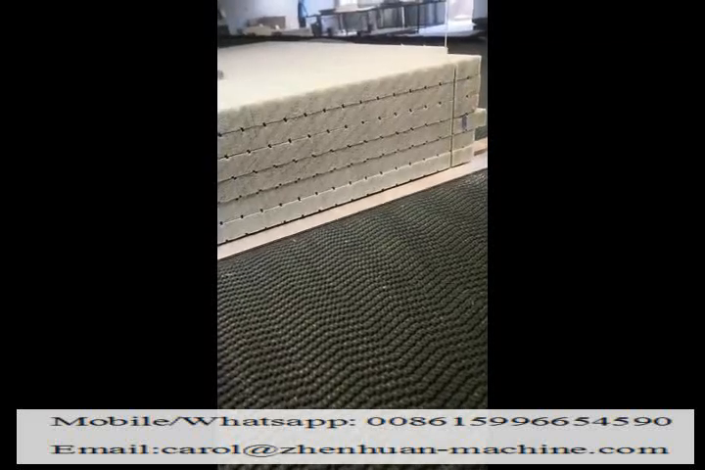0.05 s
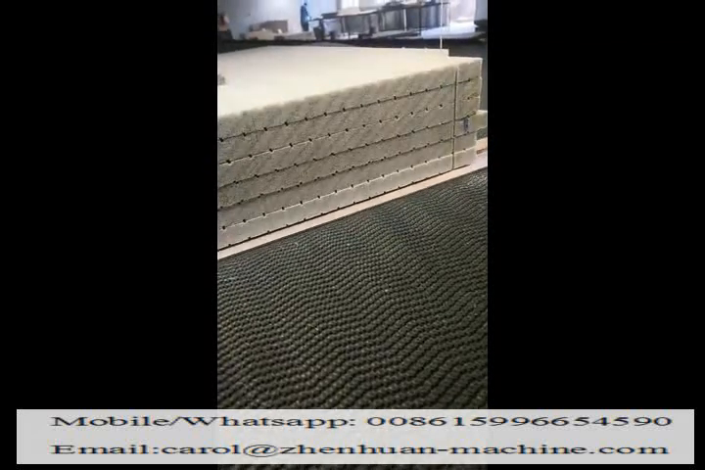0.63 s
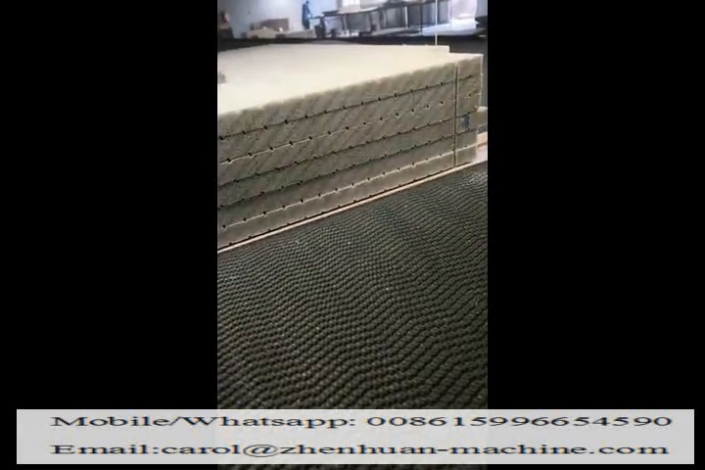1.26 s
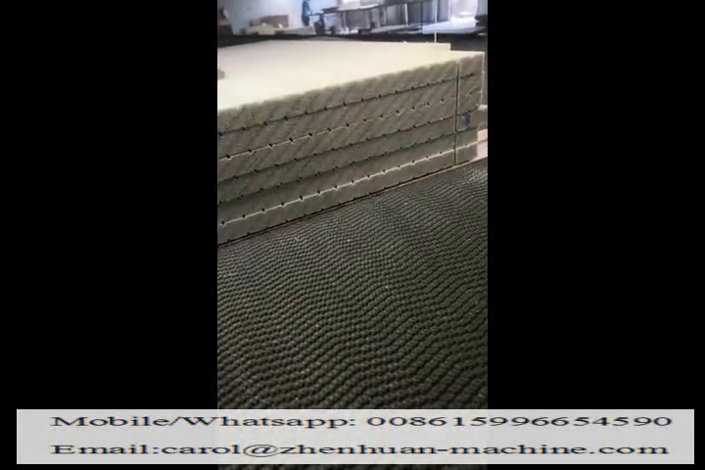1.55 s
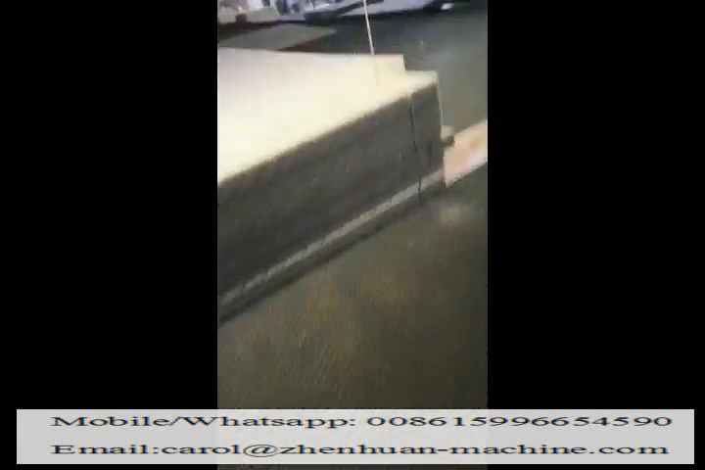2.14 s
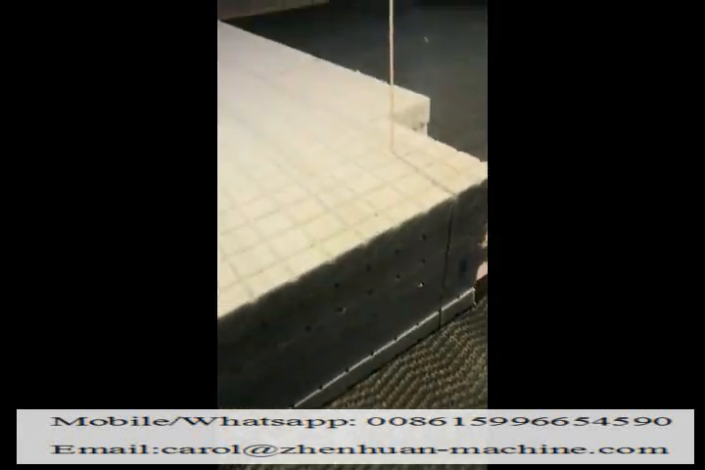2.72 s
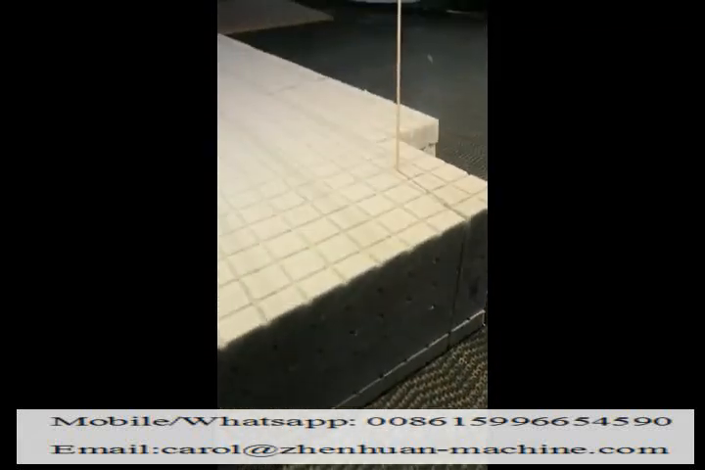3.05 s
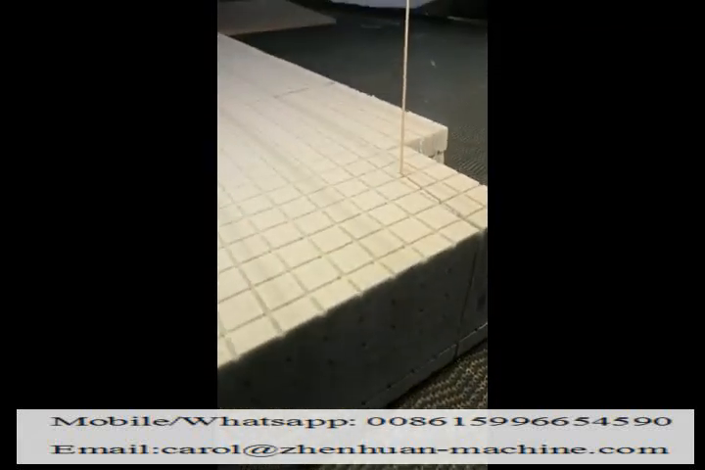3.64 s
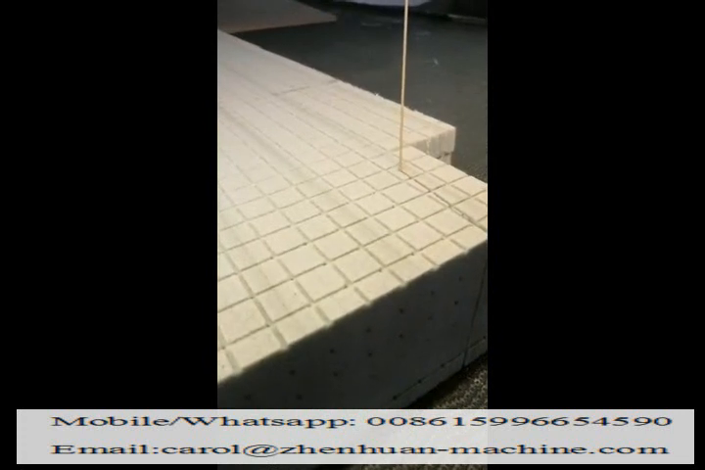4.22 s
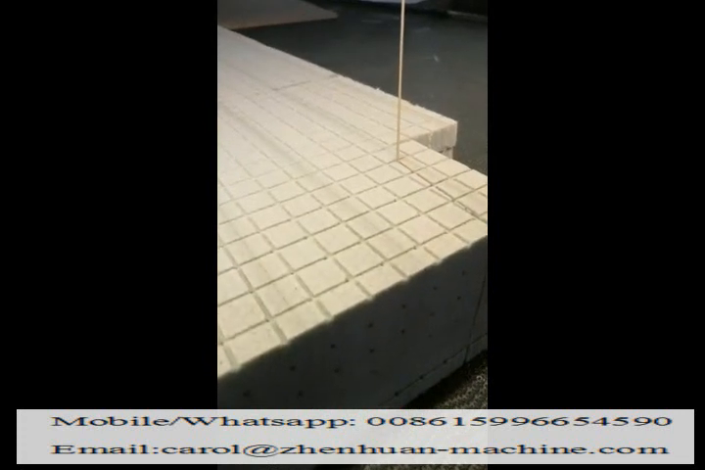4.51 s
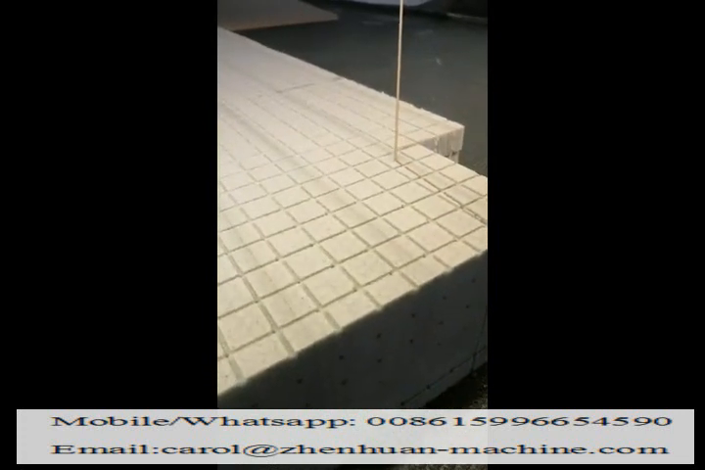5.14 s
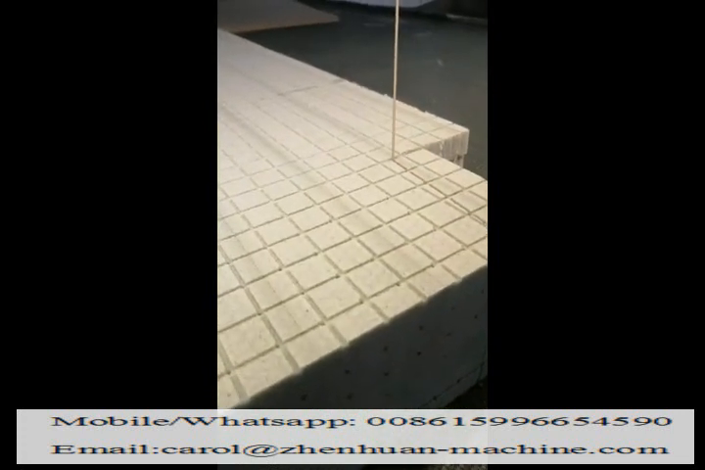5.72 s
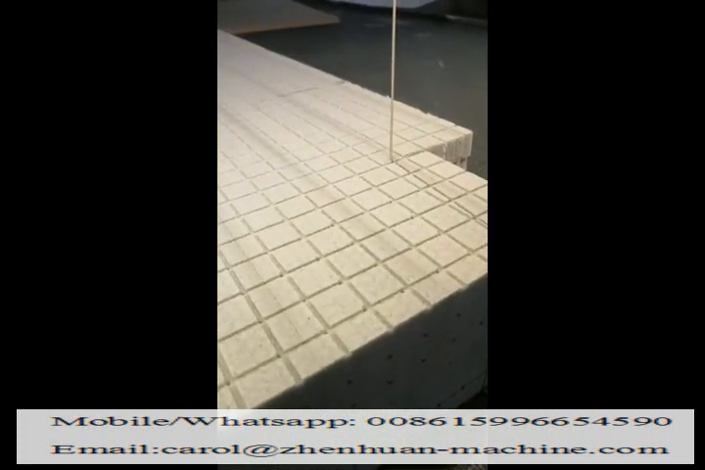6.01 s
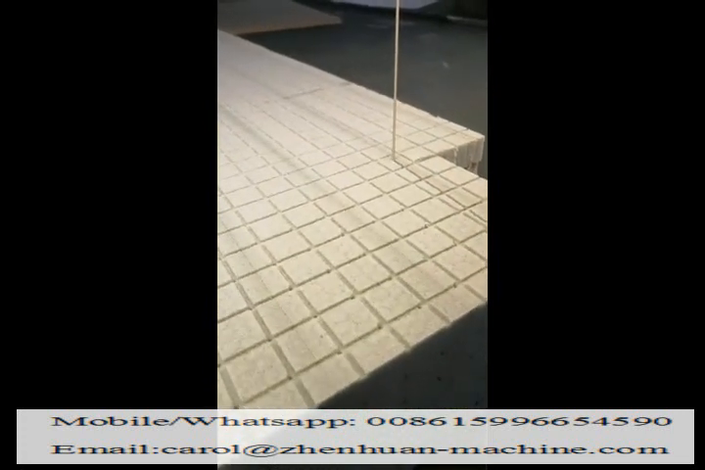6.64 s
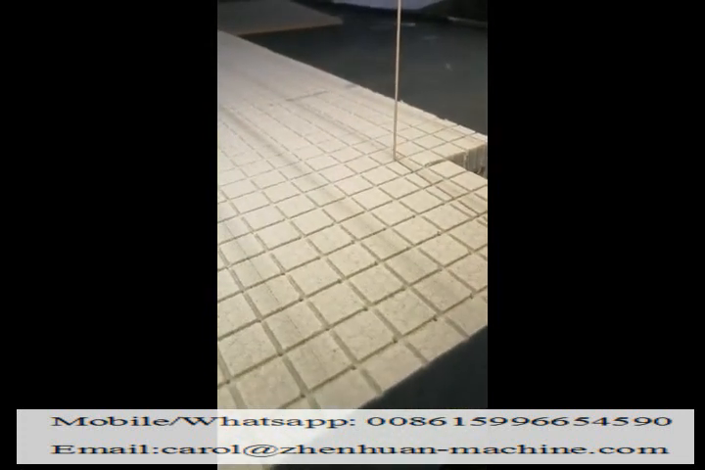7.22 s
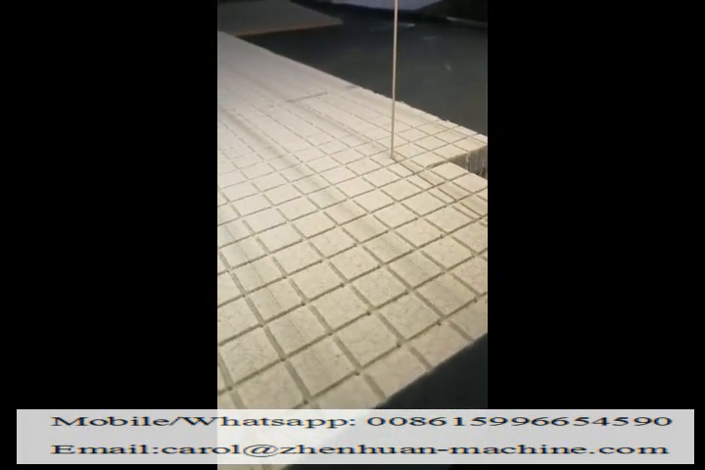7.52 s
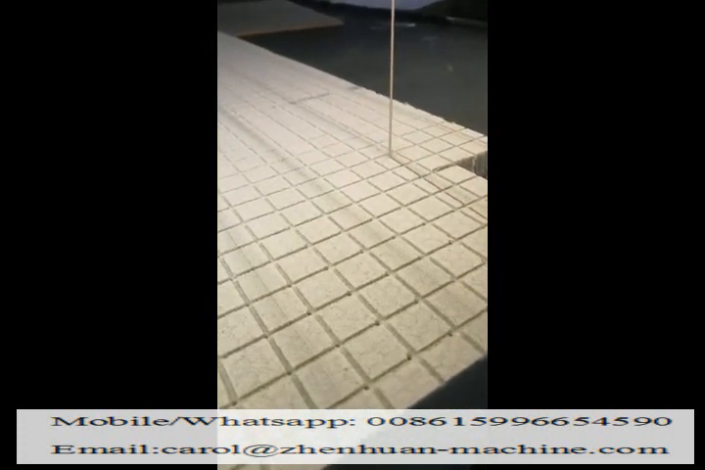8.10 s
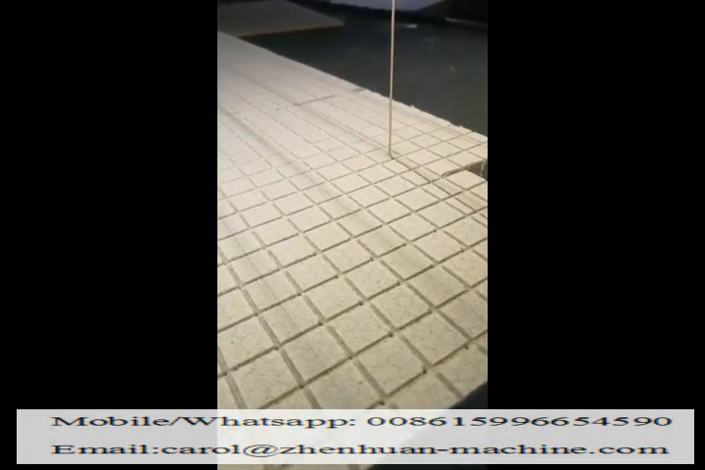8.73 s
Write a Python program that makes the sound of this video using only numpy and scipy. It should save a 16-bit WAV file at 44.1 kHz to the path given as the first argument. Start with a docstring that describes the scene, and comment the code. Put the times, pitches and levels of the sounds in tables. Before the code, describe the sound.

A band-knife foam cutter runs in a workshop for the whole nine seconds: a steady rushing roar and hiss over a low rumble, a motor hum and whining wheels. In the first second and a half a faint drive whine rises slightly and fades as the machine reaches full speed. The motor throbs most strongly from about 1 to 2.5 seconds, then pulses unevenly. The steel band sings a thin, high, wavering note, faint at first, stronger from 2 seconds and loudest from about 6.5 seconds as the microphone nears the blade. The roar surges briefly as the band bites the foam, around 3, 4.3 and 5.2 seconds, with rasping and light metallic ringing. A soft hollow ring swells near 7.5 seconds. From about 7.7 seconds to the end, short high scrapes come from the blade guide and the singing note stutters.

```python
"""Workshop: a band-knife foam cutter comes up to speed as the microphones move from block to blade.
The steel band sings near 4 kHz in its guide; the note sags and recovers once in each lap of the loop.
The band also roars and hisses, surging as it bites the foam, and rasps and scrapes in the guide.
Two drive wheels whine in close pairs of tones over a throbbing motor and the rumble of the frame."""
import sys
import numpy as np
from scipy import signal
from scipy.fft import rfft, irfft
from scipy.io import wavfile
from scipy.ndimage import uniform_filter1d

SR = 44100
rng = np.random.default_rng(int(sys.argv[2]) if len(sys.argv) > 2 else 0)


def generate_wav(sig):
    """Save sig (samples, or channels by samples) to the path in sys.argv[1] as 16-bit PCM at SR."""
    pcm = np.round(np.clip(np.atleast_2d(sig).T, -1, 1) * 32767).astype(np.int16)
    wavfile.write(sys.argv[1], SR, pcm)


N = 395136
TIME = np.arange(N) / SR
WHEELS_HZ = (216.45, 218.45)  # at full speed
LAP_S = .2842

# run-up: t/s, share of full speed
SPEED = [(0, .92), (.5, .958), (1, .983), (1.5, .993), (2.4, 1), (9, 1)]
# microphone path: t/s, place (<=0 beside the block, 1 above it, >=2 near the blade)
MIC_PLACE = [(0, -0.5), (1, 1.24), (1.8, 0.7), (2.4, 1.07), (5.3, 1.76), (6.9, 3), (9, 8.5)]
# block hiding the wheels: t/s, share hidden
WHEELS_HIDDEN = [(1.85, 0.9), (2.4, 0.32)]
# left over right: t/s, machine/dB, hiss/dB
PAN = [(0, 1, 0.49), (3, -2, -0.81), (5, -1, 0.89), (6.2, 0.5, 1.2), (8.96, 1, 1.4)]
# diffuse sound at the two microphones: f/Hz, coherence
COHERENCE = [(100, 1), (170, 1), (260, 1), (360, 0.83), (540, -0.72), (850, 0.096), (1400, 0.21),
             (2200, -0.073), (2600, -0.26), (3100, 0.077), (5000, 0.087)]


def singing_band():
    """The note slides down each lap and springs back after the weld; at times the weld catches."""
    pitch = [(0, 3985), (1.5, 4020), (2.4, 4004), (6.5, 4005), (7.7, 3994), (8.96, 3958)]  # t/s, f/Hz at full speed
    catches = [(1.9, 65), (2.58, 70), (2.77, 65), (3.05, 35), (3.33, 35), (3.91, 85), (4.48, 80),
               (5.87, 25), (6.15, 35), (7.58, 20), (8.16, 85), (8.43, 45), (8.73, 85)]  # t/s, pitch drop/Hz
    flutter = [(4.8, 1.1), (6.2, .38), (7.8, .38), (8.2, 1)]  # uneven rubbing: t/s, scatter
    levels = [(0, -39), (1.6, -39), (1.8, -30.5), (3.5, -28.5), (3.95, -27), (4.5, -32), (5.3, -27),
              (6.4, -24), (7.1, -22.8), (7.9, -22), (8.4, -23), (8.9, -23.5)]  # t/s, level/dB
    grips = [(.77, .047, 7), (2.333, .036, 5.5), (2.66, .03, 4), (2.76, .025, 3), (2.96, .035, 5),
             (3.12, .07, 2.5), (3.26, .04, -14), (3.52, .1, 3.5), (3.68, .05, -2), (3.85, .06, 4.5),
             (4.79, .04, 5), (4.996, .05, 5.5), (5.64, .04, 6), (5.943, .046, -15), (6.03, .024, 4),
             (6.14, .04, -4), (6.53, .06, 3), (6.99, .045, -4), (7.09, .05, 3), (7.29, .025, -5),
             (7.48, .04, 3), (7.69, .025, 6), (7.77, .02, 4), (7.87, .035, -4), (7.96, .02, 7),
             (8.223, .059, -14), (8.466, .038, -9), (8.72, .034, -12), (8.83, .025, 7), (8.94, .05, 6.5)]  # guide grips or lets go: t/s, half width/s, change/dB
    band_pan = [(0, 7), (1.6, -1.5), (2.8, 12), (4, 6), (5.2, 39.5), (6.5, 11.5), (8.2, 2), (8.7, -7),
                (8.96, 0)]  # t/s, left over right/dB
    slide_hz, waver_hz, spring_back_share = 47, 11, .18
    echo_s, echo_gain, catch_db_per_hz = .08, .55, .012
    lap, weld = weld_passing()
    drop_hz = sum(drop * bump(s, .028) for s, drop in catches)
    tension = np.interp(lap, [0, spring_back_share, 1], [-.5, .5, -.5])
    hz = follow(pitch)[0] * follow(SPEED)[0] + slide_hz * tension - drop_hz + waver_hz * drift(30)
    direct = tone(cycles(hz), scatter=follow(flutter)[0], per_s=75)
    # room echoes lag the pitch
    step = 1 / (echo_s * SR)
    held_hz = hz[0] + signal.lfilter([step], [1, step - 1], hz - hz[0])
    echoes = np.array([tone(cycles(held_hz), scatter=3, per_s=30) for _ in range(2)])
    grip_db = sum(db * bump(s, width_s) for s, width_s, db in grips) + 1.5 * drift(17)
    level_db = follow(levels)[0] + grip_db + weld + catch_db_per_hz * drop_hz  # weld adds 1 dB
    return unit_rms(direct + echo_gain * echoes) * gain_of(level_db) * pan_gains(follow(band_pan)[0])


def weld_passing():
    """Lap phase and nearness of the weld to the guide, both 0-1."""
    weld_at_s = 1.905
    lap = (TIME - weld_at_s) / LAP_S % 1
    return lap, np.exp(-(np.minimum(lap, 1 - lap) / .03) ** 2)


def running_band():
    """The band rushes over its wheels and rubs through the guides, louder under load."""
    roar_levels = [(0, -27), (1.85, -28), (2.5, -24.5), (3.7, -24), (6.1, -23.5), (7.3, -23.5), (8.7, -23),
                   (8.96, -26)]  # t/s, level/dB
    hiss_levels = [(0, -26.5), (.45, -30), (1.1, -28.5), (2, -28), (3.1, -26), (4.1, -27.5), (5.7, -27.5),
                   (6.4, -30.5), (8.1, -29), (8.96, -23.5)]  # t/s, level/dB
    dropout_depth = [(600, 9.5), (1200, 4.5), (1900, 2), (3200, 5.5)]  # brief random holes in the spectrum, a watery flicker: f/Hz, depth/dB
    roar_load_db, hiss_load_db = cutting_load()
    roar_pan_db, hiss_pan_db = follow(PAN)
    dropout_db = at_hz(dropout_depth, np.fft.rfftfreq(1024, 1 / SR))
    roar = noise(roar_colour, patchy_db=dropout_db, size=1024, ripple_db=.83, linked=.64)
    roar *= gain_of(follow(roar_levels)[0] + roar_load_db)
    hiss = noise(hiss_colour, patchy_db=3.5, size=1024, ripple_db=2.5, linked=.4)
    hiss *= gain_of(follow(hiss_levels)[0] + hiss_load_db)
    return roar * pan_gains(roar_pan_db) + hiss * pan_gains(hiss_pan_db)


def cutting_load():
    """Roar and hiss change in dB: the feed pulses, the band flutters, bites and briefly runs free."""
    bites = [(.66, 0.5, 0.5), (1.65, 0.5, -0.5), (2.57, 0.5, 0), (3.15, 4, 5), (3.5, 2, 2),
             (4.32, 2.3, 2.5), (5.21, 2.5, 2), (5.64, 0.5, -4), (6.12, 2.5, -3.5), (6.98, 0, 6),
             (7.5, 3.5, 0.5), (8.7, -2, -2)]  # t/s, roar change/dB, hiss change/dB
    feed_db, feed_period_s, feed_crest_s, flutter_db = .48, .442, .335, .78
    bite_s, slack_after_s, slack_s, slack_share = .018, .14, .012, .35
    load_db = feed_db * np.cos(2 * np.pi * (TIME - feed_crest_s) / feed_period_s) + flutter_db * drift(25)
    for s, *change_db in bites:
        bite = bump(s, bite_s) - slack_share * bump(s + slack_after_s, slack_s)
        load_db = load_db + np.outer(change_db, bite)
    return load_db


def roar_colour(t, hz):
    """Roar spectrum in dB: shaded by the block, combed as each wheel turn repeats part of it."""
    side = [(400, -12.5), (530, -11.5), (680, -8.5), (780, -7.5), (1000, -2.5), (1300, -10), (1650, -7.5),
            (2000, -3), (2450, -3.5), (2700, -1), (3050, -14.5), (3600, -7.5), (4400, -13.5), (5500, -33.5)]  # beside the block: f/Hz, level/dB
    above = [(400, -23.5), (530, -9.5), (680, -6.5), (780, -11), (1000, -3.5), (1300, -8), (1650, -3.5),
             (2000, -2), (2450, -3.5), (2700, -6.5), (3050, -5.5), (3600, -8), (4400, -7), (5500, -34.5)]  # above it: f/Hz, level/dB
    near = [(400, -27.5), (530, -20.5), (680, -16.5), (780, -17.5), (1000, -16.5), (1300, -16.5),
            (1650, -11.5), (2000, -6), (2450, -8), (2700, -10), (3050, -13), (3600, -13), (4400, -13.5),
            (5500, -43)]  # near the blade: f/Hz, level/dB
    covers = [(962, 17, 8.5), (1853, 27, 1.5), (3280, 68, 2.5)]  # wheel cover resonances: f/Hz, half width/Hz, rise/dB
    comb_top_hz = 3050
    place = np.clip(follow(MIC_PLACE, t)[0], 0, 2)
    broad_db = sum(np.maximum(1 - abs(place - k), 0) * at_hz(spectrum, hz)
                   for k, spectrum in enumerate([side, above, near]))
    wheel_hz = np.mean(WHEELS_HZ) * follow(SPEED, t)[0]
    depth_db = 3.3 * (1 - .5 * follow(WHEELS_HIDDEN, t)[0])
    comb_db = depth_db * np.cos(2 * np.pi * hz / wheel_hz) / (1 + (hz / comb_top_hz) ** 16)
    covers_db = sum(db * np.exp(-((hz - mode_hz) / width_hz) ** 2) for mode_hz, width_hz, db in covers)
    return broad_db + comb_db + covers_db


def hiss_colour(t, hz):
    """Hiss spectrum in dB; the block shades its lower part."""
    spectrum = [(3300, -30), (4000, -21), (4430, -5), (4570, -0.5), (4800, -1), (5300, -1), (6000, -2.5),
                (6600, -1.5), (7100, 3), (7550, 2), (7900, -65.5)]  # f/Hz, level/dB
    shade = [(4000, -0.5), (5300, -5.5), (6500, -3.5), (7400, 3)]  # f/Hz, change beside the block/dB
    beside = 1 - np.clip(follow(MIC_PLACE, t)[0], 0, 1)
    return at_hz(spectrum, hz) + beside * at_hz(shade, hz)


def wheels():
    """Two wheels whine at nearly the same pitch; each lap of the band pulls at their speed."""
    orders = [(3, -49.5, -51.5, 2.5), (4, -48.5, -50, -4), (5, -45, -44, -16), (6, -48.5, -46, 3.5),
              (7, -46.5, -50, 1), (8, -39, -43, -1.5), (9, -35, -46, -2.5), (10, -37, -43, -6.5),
              (11, -37, -38.5, -5.5), (12, -41, -43, -1.5), (13, -46, -40.5, 3.5), (15, -40, -44, -12)]  # harmonic, wheel 1 level/dB, wheel 2 level/dB, change if hidden/dB
    speed, hidden = follow(SPEED)[0], follow(WHEELS_HIDDEN)[0]
    lap_pull = .0019 * np.sin(2 * np.pi * TIME / LAP_S)
    out = np.zeros((2, N))
    for k, hz in enumerate(WHEELS_HZ):
        turns = cycles(hz * speed * (1 + lap_pull + .001023 * drift(3.056)))
        for harmonic, *levels_db, hidden_db in orders:
            pair = [tone(harmonic * turns, scatter=2.2, per_s=5.5) for _ in range(2)]
            out += gain_of(levels_db[k] + hidden_db * hidden) * pair
    return out * pan_gains(follow(PAN)[0])


def guide_rasp():
    """The cut rings the guide's narrow resonances, buzzing once per wheel turn."""
    modes = [(1703, 16, -6.5), (1820, 35, -7), (1974, 45, 2), (2614, 28, -4)]  # f/Hz, half width/Hz, level/dB
    levels = [(0, -55.5), (1.9, -38.5), (2.6, -36.5), (4.1, -31), (4.9, -37.5), (6.15, -36.5), (6.8, -30),
              (8.96, -37.5)]  # t/s, level/dB

    def colour(t, hz):
        power = sum(gain_of(db) ** 2 / (1 + ((hz - mode_hz) / width_hz) ** 2) ** 2
                    for mode_hz, width_hz, db in modes)
        return 10 * np.log10(power)

    buzz = 1 + .59 * np.cos(2 * np.pi * cycles(WHEELS_HZ[0] * follow(SPEED)[0]))
    ring = noise(colour, patchy_db=3.3, size=2048, linked=.59)
    return ring * buzz * gain_of(follow(levels)[0]) * pan_gains(follow(PAN)[0])


def scraping():
    """The band's side rubs unevenly in the guide, harder at the weld and in short bursts."""
    levels = [(0, -47), (1.9, -44), (2.6, -38.5), (4.5, -38), (6.6, -41.5), (7.7, -30), (8.96, -45.5)]  # between bursts: t/s, level/dB
    bursts = [(1.5, .05, -33), (2.585, .03, -31), (2.752, .023, -32), (3.32, .025, -31), (7.968, .028, -27),
              (8.225, .03, -22.5), (8.34, .03, -23.5), (8.725, .025, -24), (8.837, .04, -26),
              (8.93, .05, -24)]  # t/s, half width/s, level/dB
    spectrum = [(2900, -46.5), (3150, -6.5), (3400, -5.5), (3650, 1.5), (3760, -2), (3900, 6), (4020, -6),
                (4200, -49)]  # f/Hz, level/dB
    uneven_db, weld_db = 4, 4
    rub_db = uneven_db * np.minimum(drift(14), 1) + weld_db * weld_passing()[1]
    gain = gain_of(follow(levels)[0] + rub_db) + swells(bursts)
    return gain * noise(lambda t, hz: at_hz(spectrum, hz), patchy_db=5.5, size=1024)


def band_ringing():
    """The cut excites each mode of the steel band in its own short metallic surges."""
    modes = [(1875, -42), (2010, -41), (2170, -41.5), (2610, -42), (2790, -46)]  # f/Hz, level/dB
    surge_db = 7
    out = np.zeros((2, N))
    for hz, db in modes:
        surge = unit_rms(gain_of(surge_db * np.minimum(drift(9), 1.5)))
        turns = cycles(hz * (1 + .008 * drift(4)))
        out += gain_of(db) * surge * [tone(turns, scatter=1.5, per_s=12) for _ in range(2)]
    return out * pan_gains(follow(PAN)[0])


def ring_ups():
    """Shaken blade and panels swell and fade in narrow bands of noise."""
    rings = [(.55, .25, 1865, 28, -35), (.665, .028, 1875, 24, -26.5), (.89, .05, 1872, 18, -28.5),
             (.4, .4, 2205, 40, -37.5), (.5, .25, 2708, 16, -37), (1.7, .4, 1885, 45, -35.5),
             (1.75, .35, 2160, 24, -35), (1.8, .35, 2595, 16, -35.5), (2.9, .6, 2612, 14, -35.5),
             (2.303, .24, 1265, 40, -35), (4.16, .26, 105, 10, -36), (4.596, .11, 103, 14, -37.5),
             (5.142, .11, 135, 8.7, -31.5), (6.11, .07, 1936, 45, -27), (7.395, .39, 2090, 28, -28.5)]  # t/s, sigma/s, f/Hz, sigma/Hz, level/dB
    out, hz = np.zeros((2, N)), np.fft.rfftfreq(N, 1 / SR)
    for s, sigma_s, mode_hz, sigma_hz, db in rings:
        resonance = np.exp(-((hz - mode_hz) / sigma_hz) ** 2 / 2)
        left, other = irfft(rfft(rng.standard_normal((2, N))) * resonance, N)
        same = at_hz(COHERENCE, mode_hz)
        pair = unit_rms(np.array([left, same * left + np.sqrt(1 - same ** 2) * other]))
        out += gain_of(db) * np.exp(-((TIME - s) / sigma_s) ** 2 / 2) * pair
    return out


def blade_guard():
    """The guard rings hollowly along with the band."""
    levels = [(0, -40), (1, -42.5), (1.5, -57), (6.2, -55), (7.5, -35.5), (8, -43.5), (8.96, -53)]  # t/s, level/dB
    spectrum = [(520, -53), (630, -11.5), (665, 5.5), (700, -4), (740, -19.5), (900, -41.5)]  # f/Hz, level/dB
    return noise(lambda t, hz: at_hz(spectrum, hz), patchy_db=4, size=4096) * gain_of(follow(levels)[0])


def motor():
    """The motor hums at a firm pitch and throbs unevenly."""
    pitch = [(0, 201), (1, 200.5), (1.6, 202.4), (2.4, 204), (3.8, 202.5), (4.8, 204.4), (7.2, 204.2),
             (8, 202.8)]  # t/s, f/Hz
    levels = [(0, -40), (.8, -39), (.95, -30.5), (1.5, -29.5), (1.85, -31), (2.2, -29), (2.55, -30),
              (2.68, -41), (4.9, -41), (5.1, -37), (7, -37.5), (8.96, -40)]  # t/s, level/dB
    throbs = [(.97, .04, -36), (1.3, .055, -25), (1.41, .04, -31), (1.62, .055, -25), (1.74, .035, -29),
              (1.93, .04, -33), (2.15, .04, -33), (2.99, .07, -32), (3.4, .06, -33), (3.9, .05, -35),
              (4.13, .07, -33), (4.45, .06, -33.5), (5.03, .07, -31), (5.32, .08, -32), (5.54, .06, -28.5),
              (6.1, .05, -30), (6.8, .045, -32.5), (6.94, .045, -32.5), (8.32, .06, -32.5),
              (8.68, .06, -34), (8.93, .05, -33)]  # t/s, half width/s, level/dB
    gain = gain_of(follow(levels)[0]) + swells(throbs)
    return gain * tone(cycles(follow(pitch)[0]), scatter=.12, per_s=6)


def start_whine():
    """The drive whines while it pulls the wheels up to speed."""
    partials = [(791, -1), (2815, 3.5)]  # f/Hz at full speed, relative level/dB
    levels = [(0, -54), (.25, -43), (.42, -39), (1.05, -41.5), (1.3, -51), (2, -65)]  # t/s, level/dB
    speed = follow(SPEED)[0]
    whine = sum(gain_of(db) * tone(cycles(hz * speed), scatter=.58, per_s=13) for hz, db in partials)
    return gain_of(follow(levels)[0]) * whine


def frame():
    """The shaking frame rumbles and hums low tones; the cabinet drones, shaded by the block."""
    drone = [(170, -30), (235, -2.5), (275, 2), (335, 6), (385, -6), (460, -16), (600, -18), (900, -73.5)]  # f/Hz, level/dB
    frame_tones = [(102, -49.5), (145, -46), (170, -41), (296, -45.5), (334, -44), (398, -52.5)]  # f/Hz, level/dB
    shake_db = shaking(TIME)
    rumble = noise(rumble_colour, patchy_db=-.5, size=4096) * gain_of(-33 + shake_db + 1.2 * drift(6.1))
    shade_db = 1.5 * (.5 - np.clip(follow(MIC_PLACE)[0], 0, 1))
    cabinet = noise(lambda t, hz: at_hz(drone, hz), patchy_db=7.5, size=4096)
    cabinet *= gain_of(-38 + .1 * shake_db - shade_db)
    tones = sum(gain_of(db) * tone(hz * TIME, scatter=.73, per_s=3) for hz, db in frame_tones)
    return rumble + cabinet + tones


def rumble_colour(t, hz):
    """Rumble spectrum in dB; the deep bass takes little part in the shakes and wanders on its own."""
    spectrum = [(20, -30.5), (44, -10.5), (60, -17.5), (85, -10), (120, -5.5), (155, 2.5), (190, 1),
                (225, -2), (280, -19), (400, -43), (700, -80.5)]  # f/Hz, level/dB
    bass = [(0, -9), (.85, 0.5), (1.5, -3), (2.4, 4), (3.3, 0.5), (4.2, 5), (5.7, 2), (8.96, 0.5)]  # t/s, bass shelf/dB
    wander_db, shelf_hz = 7, 115
    bass_db = follow(bass, t)[0] - .8 * shaking(t) + wander_db * np.interp(t, TIME, drift(7))
    return at_hz(spectrum, hz) + bass_db / (1 + (hz / shelf_hz) ** 8)


def shaking(t):
    """Rumble rise in dB; each shake of the frame rises, holds and falls."""
    shakes = [(0.329, .45, 5.5), (1.024, 0.94, 5), (2.195, 0.36, 3), (4.467, 1, 3.5), (6.736, .52, 3),
              (8.206, 0.2, 3.5)]  # start/s, length/s, rise/dB
    edge_s = .073
    return sum(db * np.clip(np.minimum(t - s, s + length_s - t) / edge_s + .5, 0, 1)
               for s, length_s, db in shakes)


def tone(turns, scatter, per_s):
    """Tone of rms about one; workshop reflections make its level and phase wander."""
    paths = (1 + scatter * (drift(per_s) + 1j * drift(per_s))) / np.sqrt(1 + 2 * scatter ** 2)
    return np.sqrt(2) * (paths * np.exp(2j * np.pi * turns)).real


def noise(colour_db, patchy_db, size, ripple_db=0, linked=0):
    """Stereo noise shaped by colour_db(t, hz), patches and ripple; mid rms one."""
    facing = [(250, -0.65), (380, 1.5), (550, -2), (950, -0.5), (1500, 5.5), (2700, 4), (4000, -0.5),
              (4800, 1), (7500, -1.5)]  # microphone aim: f/Hz, left over right/dB
    hop = size // 4
    t, hz = np.arange(N // hop + 5)[:, None] * hop / SR, np.fft.rfftfreq(size, 1 / SR)
    a, b, c, d, patches = rng.standard_normal((5, len(t), len(hz)))
    left, independent = a + 1j * b, c + 1j * d
    patches = np.minimum(blur(patches, frames=10, bins=4), .5)  # deep dips, no flares
    # the linked share reaches the right microphone by other paths, its phase turned
    phase = np.arctan2(ripple(size), ripple(size))
    other = linked * left * np.exp(1j * phase) + np.sqrt(1 - linked ** 2) * independent
    same = mic_coherence(t, hz)
    right = same * left + np.sqrt(1 - abs(same) ** 2) * other
    shape = gain_of(colour_db(t, hz))
    shape /= np.linalg.norm(shape, axis=-1, keepdims=True)
    spectra = np.array([left, right]) * pan_gains(at_hz(facing, hz))[:, None]
    spectra *= shape * gain_of(patchy_db * patches + ripple_db * ripple(size))
    pair = signal.istft(spectra.swapaxes(1, 2), nperseg=size, noverlap=size - hop)[1][:, :N]
    return pair / pair.mean(0).std()


def mic_coherence(t, hz):
    """Diffuse workshop sound plus direct arrivals from both ends of the machine."""
    arrivals = [(.0006, .08, .22), (-.000475, .2, .06)]  # right delay/s, share at first, share near the blade
    mic_turn = [(5.1, 0), (5.8, 1)]  # t/s, share of the turn from one end to the other
    diffuse, turn = at_hz(COHERENCE, hz), follow(mic_turn, t)[0]
    direct = sum((first + (near - first) * turn) * np.exp(-2j * np.pi * hz * delay_s)
                 for delay_s, first, near in arrivals)
    return diffuse + (1 - diffuse ** 2) * direct


def ripple(size):
    """Slow random time-frequency field: reflections as the microphones move."""
    return blur(rng.standard_normal((N // (size // 4) + 5, size // 2 + 1)), frames=60, bins=3)


def blur(field, frames, bins):
    """Box-smoothed time-frequency field of rms one."""
    return unit_rms(uniform_filter1d(uniform_filter1d(field, frames, axis=0), bins, axis=1))


def drift(per_s):
    """Smooth random curve of rms one, changing about per_s times a second."""
    rate_hz = 200
    hz = np.fft.rfftfreq(2048, 1 / rate_hz)
    slow = irfft(rfft(rng.standard_normal(2048)) / (1 + (hz / per_s) ** 4))
    return unit_rms(np.interp(TIME, np.arange(len(slow)) / rate_hz, slow))


def bump(s, width_s):
    """Gaussian of height one at time s."""
    return np.exp(-((TIME - s) / width_s) ** 2)


def swells(rows):
    """Amplitude of summed bumps."""
    return sum(gain_of(db) * bump(s, width_s) for s, width_s, db in rows)


def follow(rows, t=TIME):
    """A time table's value columns at times t."""
    s, *columns = np.transpose(rows)
    return [np.interp(t, s, column) for column in columns]


def at_hz(rows, hz):
    """A spectrum table interpolated in log frequency."""
    knots_hz, values = np.transpose(rows)
    return np.interp(np.log(hz + 1), np.log(knots_hz + 1), values)


def cycles(hz):
    """Running phase in turns."""
    return np.cumsum(hz) / SR


def pan_gains(left_over_right_db):
    """Constant-power stereo gains."""
    pair = gain_of(np.array([left_over_right_db, -left_over_right_db]) / 2)
    return pair / np.sqrt(np.mean(pair ** 2, axis=0))


def gain_of(db):
    """Decibels to amplitude."""
    return 10 ** (np.asarray(db) / 20)


def unit_rms(x):
    """Scales to rms one."""
    return x / np.sqrt(np.mean(x ** 2) + 1e-20)


def scene():
    """The whole cutter, in stereo."""
    return (frame() + motor() + running_band() + blade_guard() + guide_rasp() + scraping()
            + wheels() + start_whine() + ring_ups() + band_ringing() + singing_band())


def record(dry):
    """The recorder's steep low-pass."""
    edge_hz = 7570
    taps = signal.firwin(1023, edge_hz, window=("kaiser", 9), fs=SR)
    return signal.oaconvolve(dry, taps[None], "same")


dry = scene()
out = record(dry)
generate_wav(out)
```